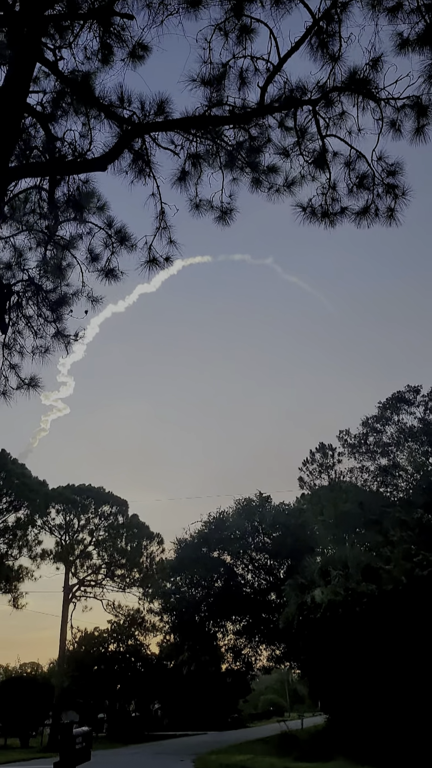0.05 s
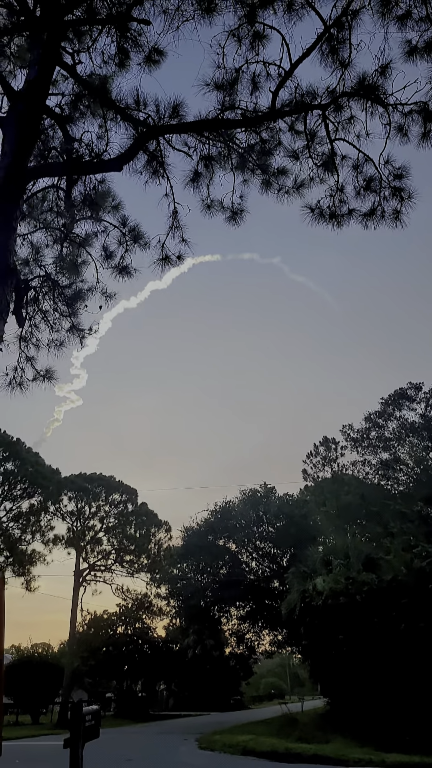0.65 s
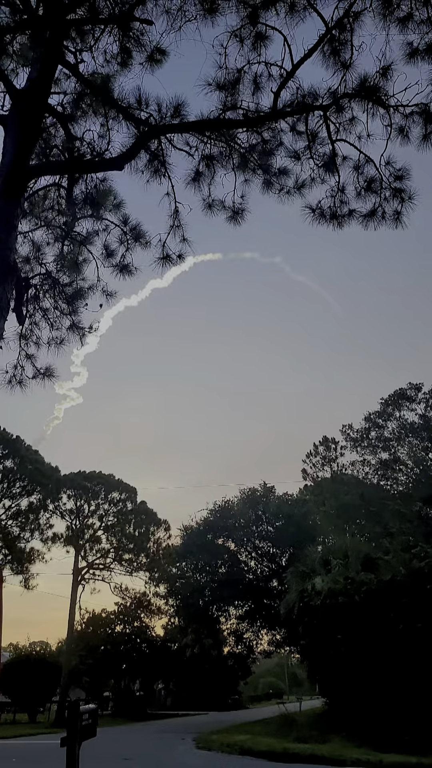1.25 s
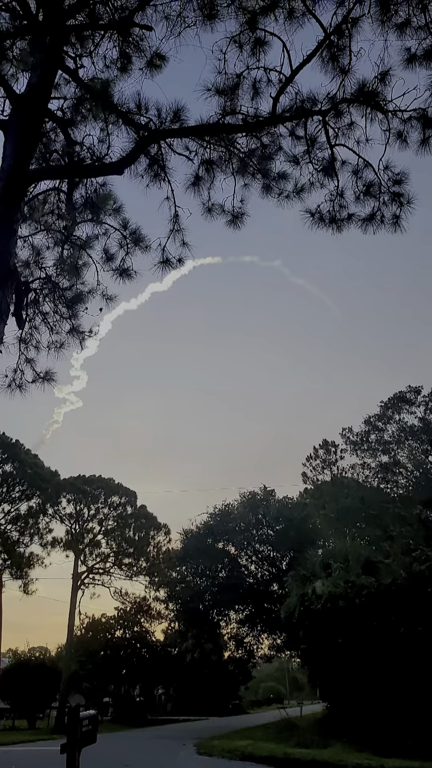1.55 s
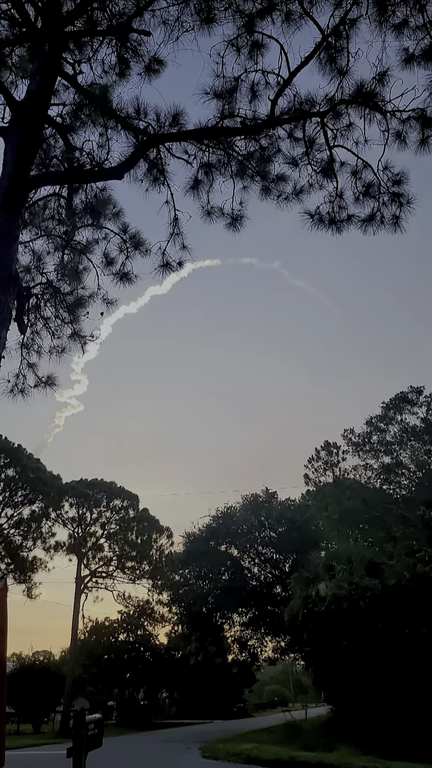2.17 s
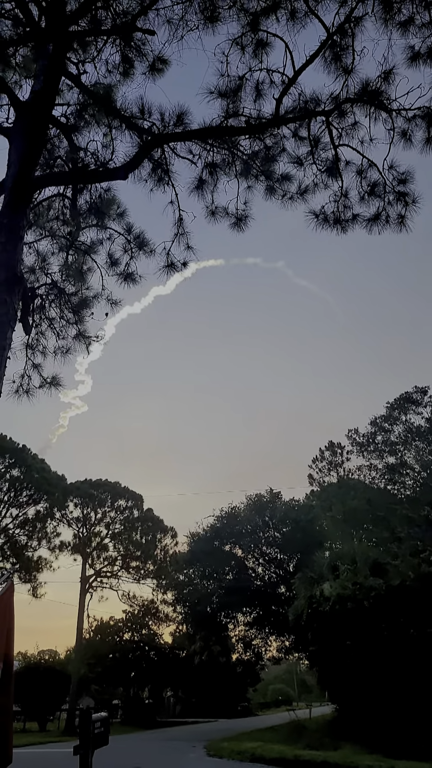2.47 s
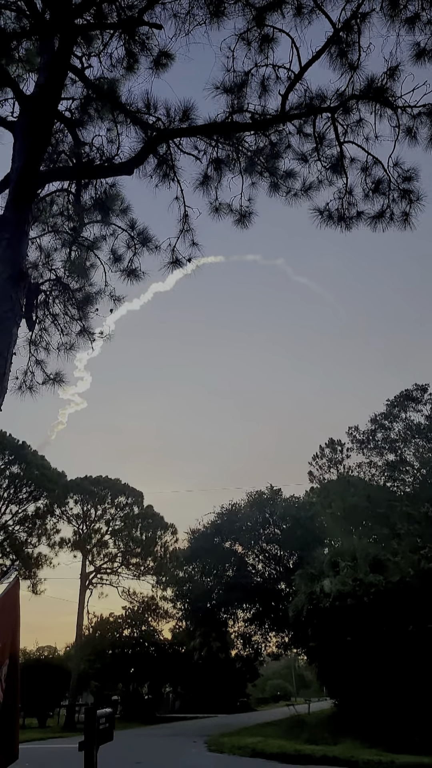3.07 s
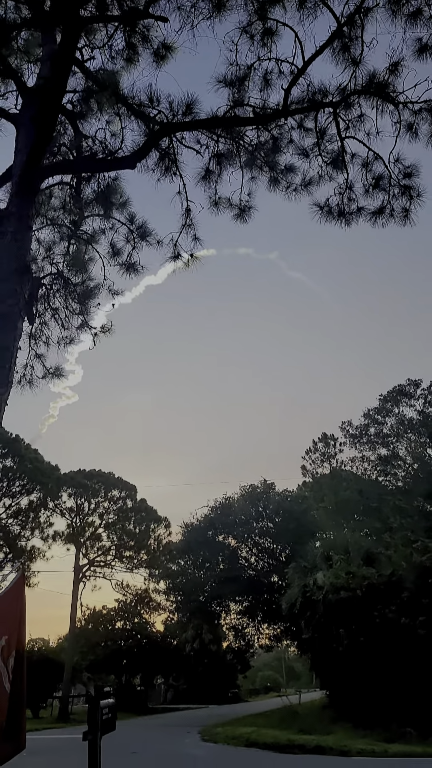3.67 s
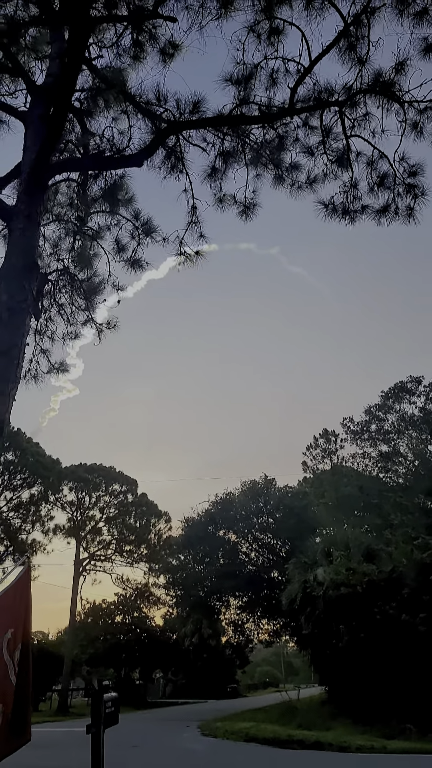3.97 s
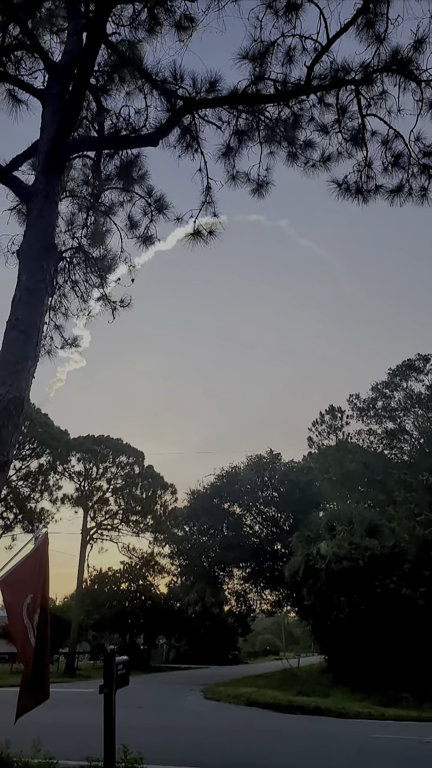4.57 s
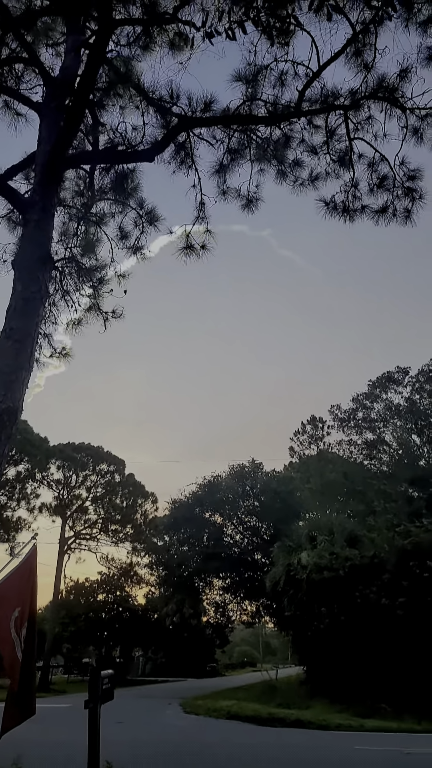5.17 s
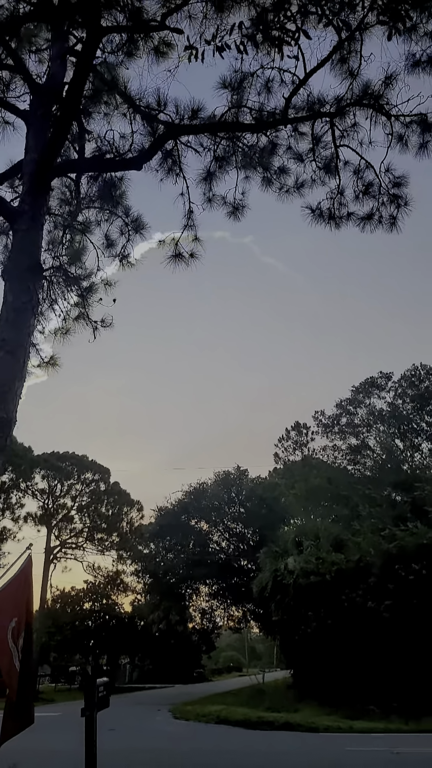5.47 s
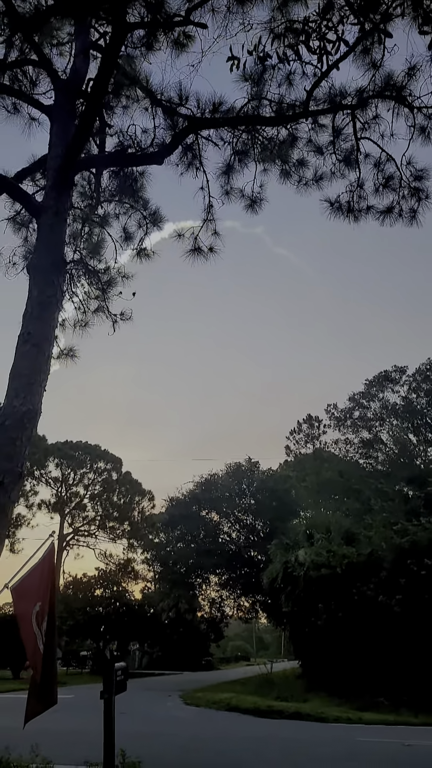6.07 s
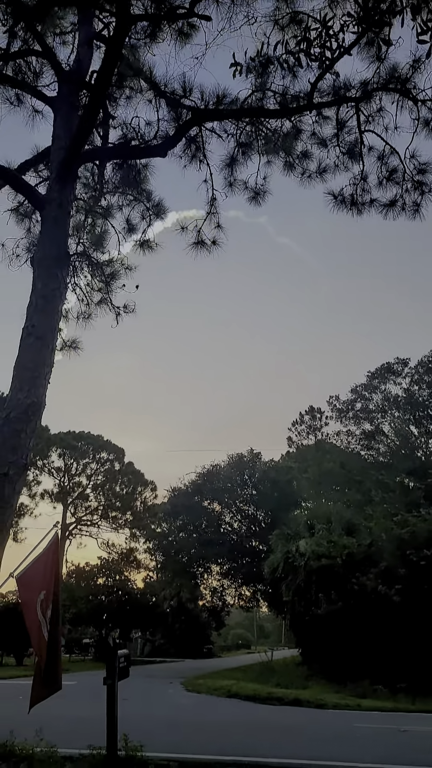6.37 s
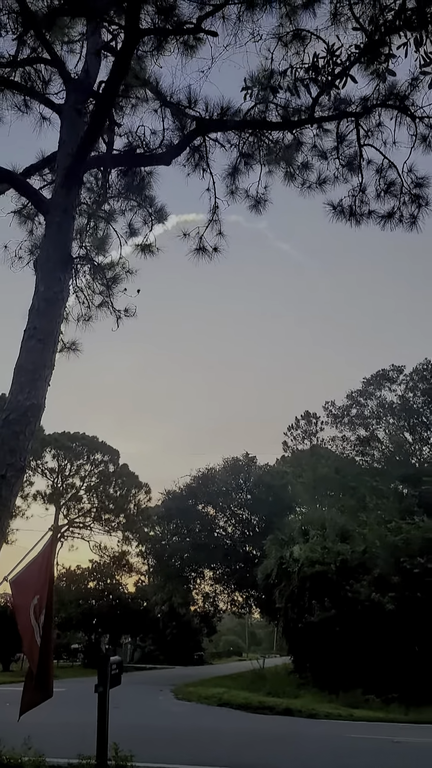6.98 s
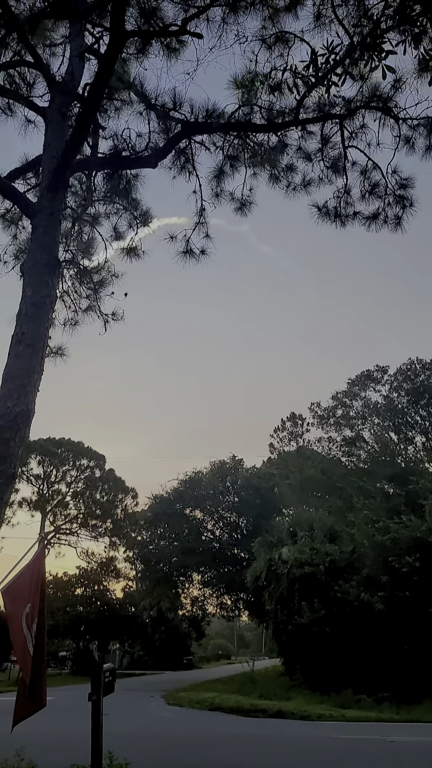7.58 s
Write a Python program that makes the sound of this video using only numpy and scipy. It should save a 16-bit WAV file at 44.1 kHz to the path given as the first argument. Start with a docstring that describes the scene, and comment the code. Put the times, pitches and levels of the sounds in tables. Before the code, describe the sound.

A distant rocket's deep rumble fills all eight seconds, heard outdoors on a quiet wooded street. Dull, irregular thuds and muffled cracks come several times a second within the roar. They are strongest from the start to about 4 seconds, ease a little afterwards, and push up again around 7 seconds. Far below this lies a soft wash of distant traffic, with a faint machine hum swelling at about 4 to 5, 6 and 7 seconds. Small birds give very faint short chirps and thin, high rising whistles from the trees, scattered throughout, with clusters near 0.7, 3 and 6 seconds. Close to the hand-held microphone, fingers rub briefly in the first half second, then make light ticks and scuffs between 4 and 6 seconds, the sharpest just before 6, and a few more around 7.5 seconds.

```python
"""Distant rocket at dusk

A far-off rocket climbs over a quiet wooded street, heard on a hand-held phone. Shock fronts
(sudden jumps in air pressure) from its exhaust arrive as dull thuds and cracks in a low roar.
Behind it, far roads hiss, a machine hums and small birds chirp and whistle in the trees.
Close by, fingers rub and tick on the phone's case."""
import sys
import numpy as np
from scipy import signal
from scipy.fft import rfft, irfft
from scipy.io import wavfile
from scipy.ndimage import minimum_filter1d

SR = 44100
rng = np.random.default_rng(int(sys.argv[2]) if len(sys.argv) > 2 else 0)


def transcribe(u):
    """Save the signal u as a 16-bit wav file named by the first command-line argument.

    u: samples, shape (n,) or (channels, n), limited to [-1, 1]; the rate is SR.
    q: integer samples, one column per channel.
    """
    v = np.clip(np.atleast_2d(u).T, -1, 1)
    q = np.round(v * 32767).astype(np.int16)
    wavfile.write(sys.argv[1], SR, q)


N = 345303
TIME = np.arange(N) / SR


def undb(db):
    """Turn decibels into a number to multiply a sound by."""
    return 10 ** (np.asarray(db) / 20)


def unit(x):
    """Scale a sound so that its average size (rms) is 1."""
    return x / np.sqrt(np.mean(x ** 2))


def curve(rows):
    """Join (time_s, value) rows with straight lines."""
    return np.interp(TIME, *np.transpose(rows))


def on_bins(points, size):
    """Join (frequency_hz, value) rows into one value for each frequency of a spectrum."""
    hz, value = np.transpose(points)
    return np.interp(np.log(np.fft.rfftfreq(size, 1 / SR) + 1), np.log(hz), value)


def noise(colour):
    """Noise with a given colour: how strong it is at each frequency."""
    return unit(irfft(rfft(rng.standard_normal(N)) * undb(on_bins(colour, N)), N))


def resonance(hz, width_hz):
    """A peak in the spectrum, 1 at its centre."""
    return 1 / (1 + (2 * (np.fft.rfftfreq(N, 1 / SR) - hz) / width_hz) ** 2)


def band(hz, width_hz):
    """Noise so narrow that it sounds like an unsteady tone."""
    return unit(irfft(rfft(rng.standard_normal(N)) * resonance(hz, width_hz), N))


def drift(turns_per_s):
    """A random wander around zero, mostly between -1 and 1."""
    knots = rng.standard_normal(4096)
    return 0.77 * np.interp(TIME * turns_per_s, np.arange(len(knots)), knots)


def pulse(colour, size=8192):
    """One short pulse with a given colour and a peak of 1."""
    cepstrum = irfft(np.log(undb(on_bins(colour, size))))
    # folding the second half onto the first packs the energy at the start (minimum phase)
    cepstrum[1:size // 2] *= 2
    cepstrum[size // 2 + 1:] = 0
    shape = irfft(np.exp(rfft(cepstrum)))
    return shape / np.abs(shape).max()


def ring(x, shape):
    """Replace every spike in x with a copy of the shape."""
    return signal.fftconvolve(x, shape)[:N]


def fade(spikes, decay_s):
    """Give every spike a quickly fading tail."""
    return ring(spikes, np.exp(-TIME[:2048] / decay_s))


def swell(start, length, edge):
    """Rise, hold and fall; the rise and the fall each take the share `edge` of the length."""
    progress = (TIME - start) / length
    return np.clip(np.minimum(progress, 1 - progress) / edge, 0, 1)


def sides(pan_db):
    """Left and right gains, the louder being 1; pan_db is left minus right."""
    return undb(np.minimum([[pan_db], [-pan_db]], 0))


def trees(x, echo_s, echo_db):
    """Echoes scatter from trunks and house fronts, different on each side."""
    tails = rng.standard_normal((2, SR)) * undb(-60 * TIME[:SR] / echo_s)
    return undb(echo_db) * np.array([ring(x, tail / np.linalg.norm(tail)) for tail in tails])


def traffic():
    """Far roads make a soft wash, wider towards the treble, with swells of tyre hiss."""
    # colour of the town's low wash: frequency_hz, level_db
    wash_colour = [(150, -24), (270, 3), (400, -6), (550, -6.5), (720, -6.5), (900, -12), (1150, -13.5),
                   (1400, -19), (2000, -35.5), (3200, -35.5), (4500, -50.5), (6500, -43), (9000, -56),
                   (12700, -40.5), (15800, -49.5)]
    # how alike left and right are: frequency_hz, likeness (0 to 1)
    wash_likeness = [(250, 0.54), (500, 0.84), (1000, 0.4), (2000, 0.12), (5000, 0.057)]
    # colour of the tyre hiss: frequency_hz, level_db
    tyre_colour = [(800, -16.5), (1300, -4.5), (1700, 2.5), (1950, -2), (2300, -11), (3200, -17.5),
                   (6000, -46.5)]
    # loudness of the tyres: time_s, level_db
    tyre_levels = [(0, -70.5), (.95, -72), (1.8, -72), (4.3, -71.5), (4.75, -64.5), (5.2, -71.5),
                   (5.75, -69), (6.0, -86), (7.83, -80)]
    likeness = np.clip(on_bins(wash_likeness, N), 0, 1)
    mid, side = (irfft(rfft(noise(wash_colour)) * np.sqrt(1 + sign * likeness), N) for sign in (1, -1))
    wash = np.array([mid + side, mid - side]) * undb(-60 + 2.7 * drift(7.7))
    tyres = np.array([noise(tyre_colour) for _ in range(2)])
    tyres *= undb(curve(tyre_levels) + 3.3 * drift(8.7))
    return (wash + tyres) * sides(-3.3)


def machine():
    """A faint hum, drone and whine waver on their way through the air."""
    # swells of the hum: start_s, length_s, level_db
    hum_swells = [(4.23, 1.15, -55), (5.848, 0.7, -57), (6.93, 1.1, -54.5)]
    # swells of the whine: start_s, length_s, pitch_hz, level_db
    whine_swells = [(1.05, 0.76, 1025, -71.5), (2.107, 0.44, 1040, -76), (3.048, 0.19, 1080, -68),
                    (4.25, 0.66, 1078, -74.5), (4.861, 0.27, 1080, -67.5), (5.558, 0.16, 1090, -66)]
    hum_hz = 246.7 + 3.9 * drift(20)
    hum_level = undb(-69) + sum(undb(db) * swell(s, length, edge=0.17) for s, length, db in hum_swells)
    hum = np.sin(2 * np.pi * np.cumsum(hum_hz) / SR) * hum_level * undb(0.79 * drift(5.1))
    drone = band(350, width_hz=2.8) * (undb(-71) + undb(-65) * swell(4.29, length=0.88, edge=0.47))
    whine = band(1046, width_hz=50) * undb(-79.5)
    for start, length, hz, db in whine_swells:
        whine += band(hz, width_hz=50) * undb(db) * swell(start, length, edge=0.15)
    return hum + drone + whine * sides(-0.53)


def bird_whistles():
    """Thin gliding notes come from deep in the trees, fluttering and blurred by the leaves."""
    # one bird's repeated rising whistle: start_s, length_s, level_db
    whistles = [(0.155, 0.3, -73), (1.218, 0.28, -80), (2.36, 0.31, -78), (3.455, 0.28, -76),
                (3.883, 0.17, -80.5), (4.691, 0.19, -77), (5.809, 0.12, -79), (7.086, 0.11, -77.5)]
    # fainter, slightly higher notes: start_s, length_s, level_db
    replies = [(1.17, 0.13, -87.5), (1.501, .11, -89.5), (3.383, 0.071, -85), (4.3, 0.087, -93),
               (5.11, 0.1, -88)]
    # still higher notes that fall: start_s, first_pitch_hz, level_db
    falls = [(.55, 8300, -83), (.66, 7500, -80.5), (6.115, 7860, -79)]
    waver, flutter = drift(260), unit(undb(5 * drift(70)))

    def note(start, length, glide_hz, db, waver_hz=110):
        """One note that slides between two pitches."""
        pitch = np.interp(TIME, [start, start + length], glide_hz) + waver_hz * waver
        level = undb(db) * swell(start, length, edge=0.16) * flutter
        return level * np.sin(2 * np.pi * np.cumsum(pitch) / SR)
    notes = sum(note(start, length, (6090, 6270), db) for start, length, db in whistles)
    notes += sum(note(start, length, (6390, 6460), db) for start, length, db in replies)
    notes += sum(note(start, .1, (hz, hz - 330), db, waver_hz=260) for start, hz, db in falls)
    return .35 * notes + trees(notes, echo_s=.5, echo_db=-2.5)


def bird_chirps():
    """Short ragged calls: a shaky pitch rises, falls and breaks up into rasp."""
    # the calls: start_s, length_s, strongest_hz, level_db, rasp (0 to 1)
    chirps = [(0.524, 0.06, 3250, -73, 0.3), (0.626, 0.029, 3510, -72, 0.2),
              (0.733, 0.043, 3530, -68, 0.35), (0.923, 0.062, 3830, -78, 0.25),
              (1.45, 0.023, 3390, -77.5, 0.1), (1.593, 0.018, 3470, -77.5, 0.2),
              (1.86, 0.042, 3150, -74, .4), (2.02, 0.081, 3186, -73.5, .5),
              (2.509, 0.041, 3490, -75.5, 0.07), (3.052, 0.025, 2840, -66.5, 0.22),
              (3.2, 0.11, 2890, -74.5, 0.3), (3.314, 0.045, 3300, -69, .1), (5.788, 0.07, 3370, -68, 0.2),
              (5.945, .02, 3250, -67, 0.05), (6.166, 0.056, 4290, -77.5, 0.15),
              (6.233, 0.055, 3430, -69, 0.1), (6.627, 0.041, 3180, -70, 0.35),
              (6.977, 0.038, 2960, -80.5, 0.03), (7.776, 0.071, 3400, -81.5, .1)]
    # colour of the rasp: frequency_hz, level_db
    rasp_colour = [(1000, -19), (1700, 0), (2400, 4), (3400, -1.5), (4400, -6), (5100, -18), (9000, -32.5)]
    jitter, voice, rasp_level = drift(250), 0, 0
    for start, length, hz, db, rasp in chirps:
        arch = np.sin(np.pi * np.clip((TIME - start) / length, 0, 1))
        pitch = hz / 3 * (1 + .06 * (arch - .8) + .025 * jitter)  # the third harmonic is the strongest
        phase = 2 * np.pi * np.cumsum(pitch) / SR
        tone = np.sin(3 * phase) + .45 * np.sin(2 * phase) + .4 * np.sin(4 * phase)
        effort = undb(db) * swell(start, length, edge=0.34)
        voice += effort * np.sqrt(1 - rasp) * tone
        rasp_level += effort * np.sqrt(rasp)
    calls = (voice + rasp_level * noise(rasp_colour)) * unit(undb(4 * drift(250)))
    return calls * sides(-0.18) + trees(calls, echo_s=.4, echo_db=-3)


def rubbing():
    """Skin sticks and slips on the case; gives the hiss level, scuff level and grittiness over time."""
    # finger slides: start_s, length_s, level_db, pan_db, scuff_over_hiss_db, grit (0 to 1)
    slides = [(0.056, 0.21, -62.5, -9, -21, 0), (0.223, 0.23, -64, -10, -14, 0.08),
              (2.013, 0.11, -77.5, -3.5, 1, 0.5), (2.655, 0.087, -68, -15, 2.5, .6),
              (2.73, .3, -88.5, 4.5, -3, 0.4), (3.076, 0.048, -67.5, -10.5, 3.5, 0.5),
              (3.303, 0.047, -69, -14.5, -5.5, 0.58), (4.123, 0.046, -57.5, -30, -28, 0.54),
              (4.581, 0.13, -66.5, -14, -4, 0.95), (4.695, 0.11, -75.5, -12, 4.5, .8),
              (4.975, 0.069, -69, -11.5, 1, 0.75), (5.476, 0.051, -68.5, -15, 2, .9),
              (5.733, 0.086, -67.5, -13.5, 1, 0.8), (5.9, 0.048, -53.5, -15, -16, 0.9),
              (6.33, .11, -73, -14, 6, 0.8), (6.405, 0.055, -59.5, -11, -10, 0.83),
              (6.439, .085, -77, -6, 17.5, 0.4), (6.51, 0.19, -88, -8, 10.5, 0.55),
              (7.36, 0.073, -72.5, -6, -8.5, .9), (7.577, 0.094, -72, -8.5, -12.5, 0.9)]
    # rustle of the restless grip: time_s, level_db
    grip_levels = [(0, -72.5), (.6, -80), (1.1, -95), (2.5, -90.5), (2.75, -78.5), (3.3, -80), (3.6, -88.5),
                   (4.0, -77.5), (4.4, -88.5), (4.56, -74.5), (4.95, -77.5), (5.2, -86.5), (5.45, -78),
                   (5.85, -73), (6.2, -89), (7.25, -82.5), (7.45, -72.5), (7.7, -77), (7.83, -85)]
    slips_per_s, creaks_per_s, settle_s, slide_edge_s = 260, 81, 0.036, 0.06
    slips = (rng.random(N) < slips_per_s / SR) * undb(5 * np.minimum(rng.exponential(size=N), 3.5))
    grain = unit(fade(slips, decay_s=.001) + .3)
    # the grip rustles more around the middle of each slide
    unrest = np.max([np.exp(-np.abs(TIME - start - length / 2) / settle_s) * (TIME > start) * undb(db - 9)
                     for start, length, db, *_ in slides], axis=0)
    creaks = fade((rng.random(N) < creaks_per_s / SR) * rng.uniform(.3, 2, N), decay_s=.0015)
    grip = undb(curve(grip_levels)) * (0.62 + undb(2.5) * creaks)
    hiss = (grip + unrest) * undb(3 * drift(12)) * sides(-4)
    scuff, grittiness = undb(-4.5) * hiss, 0
    for start, length, db, pan_db, scuff_db, grit in slides:
        push = swell(start, length, edge=min(.5, slide_edge_s / length))
        slide = undb(db) * push * (1 - grit + grit * grain)
        hiss += slide * sides(pan_db)
        scuff += slide * undb(scuff_db) * sides(pan_db / 2)
        grittiness += grit ** 2 * push
    return hiss, scuff, grittiness


def ticking(grittiness):
    """Hard nail and soft skin tick on the case; gives the level of each over time."""
    # ticks of the grip: start_s, level_db, pan_db, nail_share (0 to 1)
    ticks = [(0.466, -50, -8, 0.8), (.481, -55, -4.5, 0.76), (2.653, -56, -4, 0.9),
             (3.098, -62.5, -4.5, 0.1), (3.443, -58, -11, 0.94), (3.93, -53, -5, 0.4),
             (4.063, -49.5, -14.5, 0.93), (4.151, -44, -29, 1), (4.246, -45.5, -3.5, 0.6),
             (4.536, -48.5, -1, 0.7), (4.641, -47, -9, 0.98), (4.669, -47, -14, 0.98),
             (4.77, -51.5, -8.5, 0.9), (5.403, -49, -11.5, 0.75), (5.49, -53.5, 2.5, 0.93),
             (5.558, -54, -9, 0.27), (5.708, -53, -4.5, 0.8), (5.772, -45.5, 8.5, 0.76),
             (5.779, -49.5, -4, 0.4), (5.92, -40.5, -23.5, 0.4), (5.926, -33, -10, 0.7),
             (6.048, -63, -10, .95), (6.108, -60, -10.5, .95), (6.447, -54, 2, 0.9), (6.475, -57, -13, 0.1),
             (6.531, -67.5, -6, .05), (6.848, -64, -1.5, 0.5), (7.324, -45.5, -10, 0.83),
             (7.386, -52, -3, .95), (7.395, -49, -6.5, 0.95), (7.525, -63, -8, .15), (7.555, -70, -6, .2),
             (7.61, -48, 0.5, 0.4)]
    stray_per_s, slip_within_s = 56 * grittiness, 0.013  # gritty slides add stray tiny ticks
    nail = (rng.random(N) < stray_per_s / SR) * rng.random(N) * undb(-57) * sides(-9.5)
    skin = np.zeros((2, N))
    for start, db, pan_db, nail_share in ticks:
        lags = rng.random(3)  # three weaker slips follow each tick
        at = ((start + slip_within_s * np.append(0, lags)) * SR).astype(int)
        tick = undb(db) * sides(pan_db) * np.append(1, undb(-15) * (1.3 - lags))
        nail[:, at] += nail_share * tick
        skin[:, at] += (1 - nail_share) * tick
    nail = np.array([fade(side, decay_s=.0008) for side in nail])
    skin = np.array([fade(side, decay_s=.0028) for side in skin])
    return nail, skin


def case_noise(colours):
    """Noise rings through the phone's case to two microphones, each with its own colour."""
    # narrow resonances of the case: pitch_hz, boost_db
    peaks = [(3300, 6.5), (3762, 2), (4190, 5), (4353, 4.5), (4733, 5), (5693, 3), (7250, 1.5)]
    boost = 1 + sum((undb(db) - 1) * resonance(hz, width_hz=37) for hz, db in peaks)
    white = rng.standard_normal(N) + 6.9 * rng.standard_normal((2, N))  # the sides share only a little
    return np.array([unit(irfft(rfft(side) * boost * undb(on_bins(colour, N)), N))
                     for side, colour in zip(white, colours)])


def fingers():
    """Rubs and ticks are heard as bursts of noise through the phone's case."""
    # colour of the case at each microphone: frequency_hz, left_db, right_db
    case_colour = [(700, -21.5, -21), (1580, 1, 2.5), (2580, -5.5, -6.5), (4620, -10, -3),
                   (6040, -3.5, -7.5), (7600, 4, 0), (7900, 0.5, -8), (10800, 1, -1.5), (13300, -1.5, 6.5),
                   (15200, -3.5, -2.5), (16300, -21, -9)]
    # colour of a soft touch: frequency_hz, level_db
    skin_colour = [(600, -9.5), (1500, 1), (2500, 6), (3400, 1), (4500, 1), (7400, -0.5), (9000, -21),
                   (15000, -32)]
    # colour of dragging skin: frequency_hz, level_db
    scuff_colour = [(700, -8), (1600, 4.5), (2500, 6.5), (3400, 2), (4300, -3), (5500, -13.5),
                    (7500, -14.5), (10000, -26), (15000, -38)]
    hiss, scuff, grittiness = rubbing()
    nail, skin = ticking(grittiness)
    hz, left_db, right_db = np.transpose(case_colour)
    touch = (hiss + nail) * case_noise([np.column_stack([hz, db]) for db in (left_db, right_db)])
    touch += skin * case_noise([skin_colour] * 2)
    touch += scuff * case_noise([scuff_colour] * 2)
    return touch + trees(touch.mean(axis=0), echo_s=0.23, echo_db=-11.5)


def lesser_fronts(strong):
    """Spikes for the weaker shock fronts; close ones merge on the way, so these stay apart."""
    gaps_s = rng.uniform(.018, .06, 512)
    arrivals = (np.cumsum(gaps_s) * SR).astype(int)
    spikes = np.zeros(N)
    spikes[arrivals[arrivals < N]] = 1
    sizes = undb(2.73 * rng.uniform(-2, 2, N))
    clear = minimum_filter1d(-strong, size=1800) == 0  # no strong front within about 20 ms
    return spikes * sizes * clear


def shock_cracks(edges):
    """A front's steep edge snaps just after its thud begins; swirling air frays it into a burst."""
    # colour of a crack: frequency_hz, level_db
    crack_colour = [(90, -19.5), (190, 8), (350, 0.5), (520, -4), (780, -9), (1000, -25.5), (1500, -36.5),
                    (4000, -56)]
    snap_lag_s, fray_s = .007, .006
    snap = np.roll(ring(edges, pulse(crack_colour)), int(snap_lag_s * SR))
    age = TIME[:4096] / fray_s
    burst = age ** 2 * np.exp(2 * (1 - age))
    frayed = ring(edges, burst) * noise(crack_colour)
    return undb(3) * snap + undb(-0.5) * frayed


def rocket():
    """Strong shock fronts from the exhaust thud and crack; a crowd of lesser ones blends into a roar."""
    # the strongest fronts: start_s, thud_db, crack_db
    shocks = [(.0095, -17, -45), (0.182, -15.5, -62.5), (0.2408, -8.5, -38.5), (0.276, -18, -67),
              (0.354, -18.5, -70.5), (0.4904, -19, -58), (0.5204, -10, -41.5), (0.6461, -11, -43),
              (0.681, -9, -44), (0.787, -7, -37), (0.906, -14.5, -66), (0.984, -9, -42.5),
              (1.073, -16.5, -66.5), (1.162, -13, -62.5), (1.2167, -11, -41), (1.292, -16, -48.5),
              (1.3807, -8.5, -46.5), (1.438, -17, -60.5), (1.69, -12.5, -57), (1.724, -10.5, -47),
              (1.748, -15, -58), (1.816, -13.5, -62.5), (1.9887, -10.5, -42), (2.045, -11.5, -48),
              (2.197, -15.5, -43.5), (2.262, -16, -62), (2.338, -15, -46), (2.35, -11.5, -63.5),
              (2.4101, -18, -60), (2.4523, -9, -44.5), (2.5345, -9, -41.5), (2.638, -13.5, -61),
              (2.8661, -12, -43.5), (2.979, -13.5, -61), (3.1225, -14, -58), (3.2174, -8, -41),
              (3.409, -13, -69.5), (3.532, -11.5, -74), (3.67, -11.5, -52), (3.725, -7, -42.5),
              (3.8141, -11.5, -50.5), (3.832, -5, -64.5), (3.8903, -8.5, -53), (3.9823, -9.5, -42),
              (4.036, -9.5, -45), (4.167, -13.5, -41.5), (4.226, -15, -47.5), (4.377, -18.5, -67),
              (4.713, -15, -57), (4.775, -20.5, -60), (4.846, -15.5, -59.5), (5.041, -10, -42.5),
              (5.1268, -13, -56.5), (5.2, -17, -63.5), (5.2809, -12, -63.5), (5.352, -17.5, -61),
              (5.5522, -14, -63), (5.652, -13, -44.5), (5.741, -17, -55.5), (5.783, -14.5, -62.5),
              (6.039, -14, -58.5), (6.174, -18, -58), (6.403, -14.5, -56.5), (6.591, -15, -62.5),
              (6.6532, -12, -61.5), (6.731, -12, -54.5), (6.841, -12.5, -60), (6.8799, -14.5, -59),
              (7.009, -13.5, -67.5), (7.0988, -10, -58.5), (7.15, -6.5, -48.5), (7.222, -12, -65.5),
              (7.3135, -14, -59), (7.4099, -11.5, -46), (7.498, -16, -54.5), (7.546, -17.5, -56),
              (7.569, -16, -58), (7.762, -18.5, -66)]
    # loudness of the rocket's noise: time_s, lesser_fronts_db, roar_db
    levels = [(0, -35.5, -26), (1.4, -28, -25.5), (1.8, -29, -30.5), (2.6, -30, -26), (3.299, -29.5, -25),
              (3.899, -27.5, -24.5), (4.45, -29.5, -31.5), (5.7, -32, -29.5), (6.55, -30, -33.5),
              (7.05, -29.5, -27.5), (7.55, -31, -30), (7.83, -34, -30)]
    # one front after miles of air and the microphone's bass cut: frequency_hz, level_db
    thud_colour = [(15, -51), (30, -12.5), (55, -2.5), (90, -2), (140, -14.5), (200, -26.5), (300, -55.5),
                   (700, -64.5), (2000, -100)]
    # the growl at the top of the roar: frequency_hz, level_db
    growl_colour = [(80, -21), (140, 6), (175, 9), (230, 1.5), (320, -10.5), (500, -32.5), (1000, -69.5)]
    # the deep roar between the fronts: frequency_hz, level_db
    roar_colour = [(12, -14.5), (22, -16.5), (31, -13), (40, -9.5), (52, 3), (68, 3), (95, -1.5),
                   (130, -22), (175, -17), (230, -29), (330, -50.5), (800, -85.5)]
    # moving air rounds the fronts off more at some times than others: time_s, upper_bass_db
    steepness = [(0, 11.5), (.7, -3.5), (1.3, 3.5), (1.8, -1.5), (2.3, 4), (2.9, 2), (3.4, -5.5),
                 (3.8, -14), (4.2, 1.5), (4.8, -6), (5.7, 1.5), (6.2, 3.5), (6.7, -5.5), (7.15, -21),
                 (7.5, 0), (7.83, 1)]
    upper_bass_from_hz = 105
    times, lesser_db, roar_db = np.transpose(levels)
    lesser_level, roar_level = (undb(np.interp(TIME, times, db)) for db in (lesser_db, roar_db))
    strong, edges = np.zeros((2, N))
    for start, thud_db, crack_db in shocks:
        at = int(start * SR)
        strong[at], edges[at] = undb(thud_db), undb(crack_db)
    lesser = lesser_fronts(strong)
    crowd = unit(ring(lesser, pulse(thud_colour)))
    growl = undb(-24 + 5 * drift(8)) * unit(ring(lesser, pulse(growl_colour)))
    # a stronger front is steeper: its crack grows as the square of its size
    edges += lesser_level * undb(-34.5) * (lesser / lesser.max()) ** 2
    cracks = shock_cracks(edges)
    thuds = ring(strong, pulse(thud_colour)) + lesser_level * (crowd + growl)
    deep_bass = signal.sosfiltfilt(signal.butter(2, upper_bass_from_hz, fs=SR, output="sos"), thuds)
    upper_bass = undb(curve(steepness)) * (thuds - deep_bass)
    direct = deep_bass + upper_bass + roar_level * noise(roar_colour) + cracks
    # noise added on the left and taken away on the right widens the roar
    width = lesser_level * (undb(-18.5) * noise(roar_colour) + undb(-31.5) * noise(growl_colour))
    return direct * sides(-.7) + np.array([width, -width]) + trees(cracks, echo_s=0.37, echo_db=-8)


def scene():
    """The rocket above the evening street, in stereo."""
    return rocket() + traffic() + machine() + fingers() + bird_chirps() + bird_whistles()


def record(dry):
    """The phone cuts off the highest treble."""
    top_hz = 15700
    return signal.sosfilt(signal.ellip(10, .2, 70, top_hz, fs=SR, output="sos"), dry)


dry = scene()
out = record(dry)
transcribe(out)
```